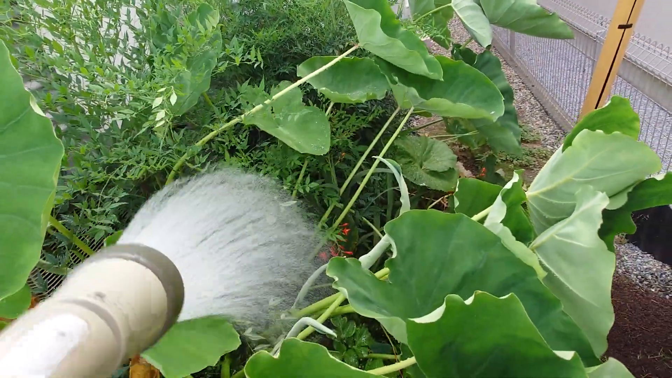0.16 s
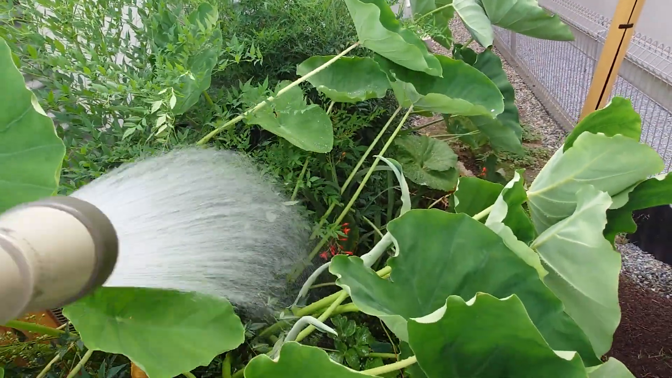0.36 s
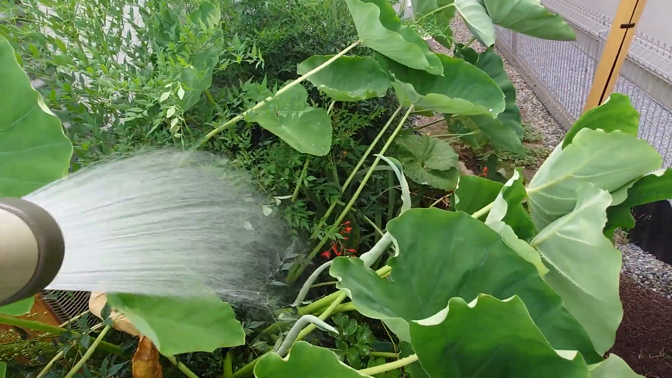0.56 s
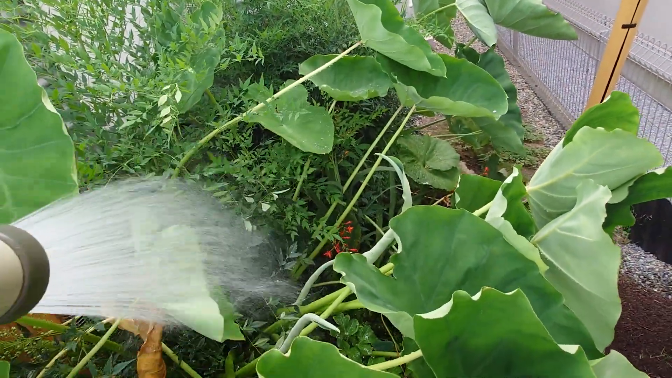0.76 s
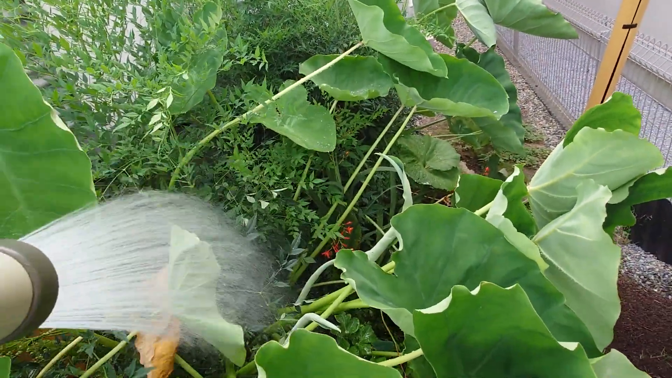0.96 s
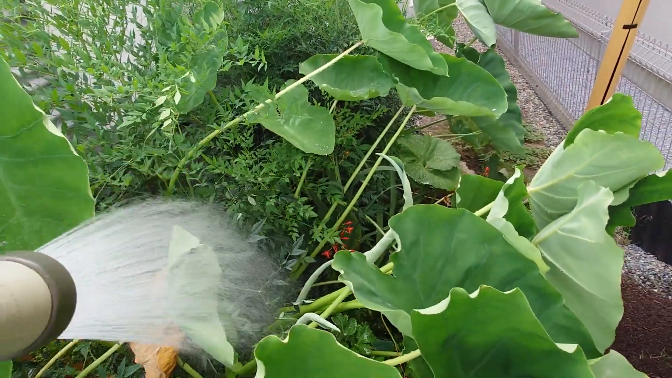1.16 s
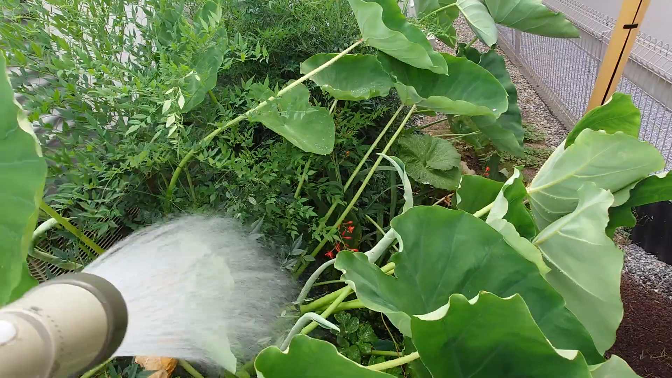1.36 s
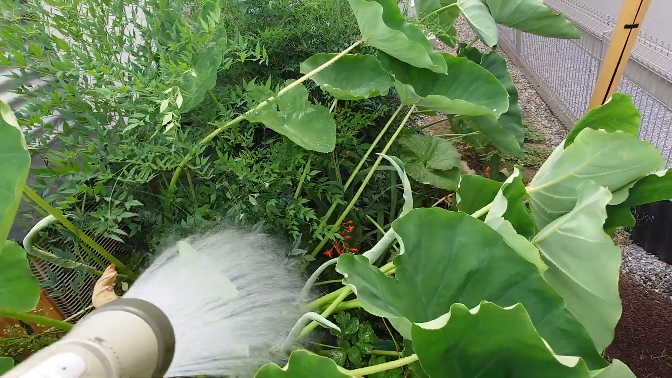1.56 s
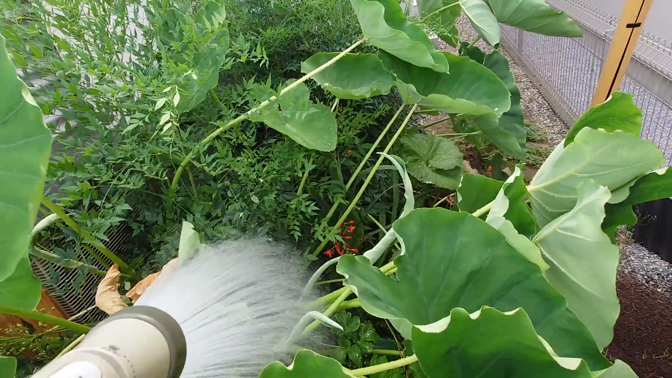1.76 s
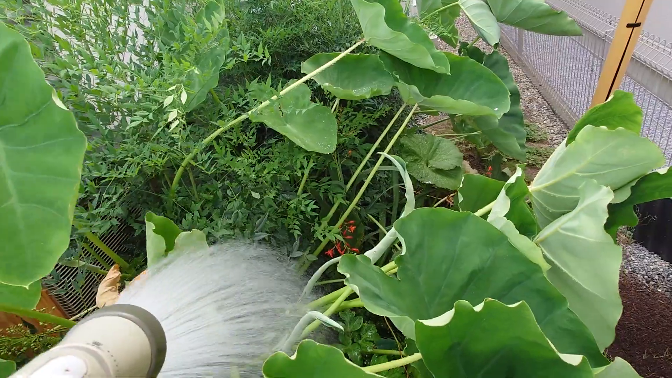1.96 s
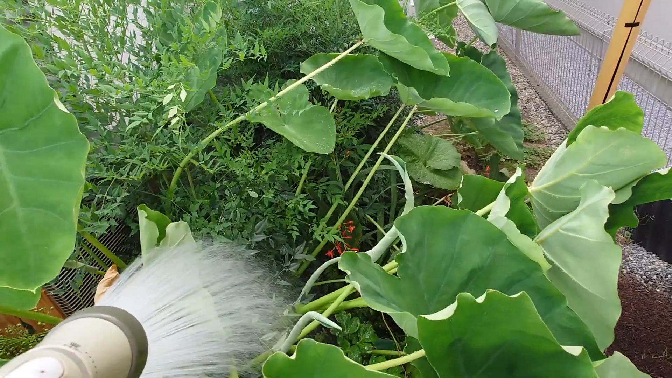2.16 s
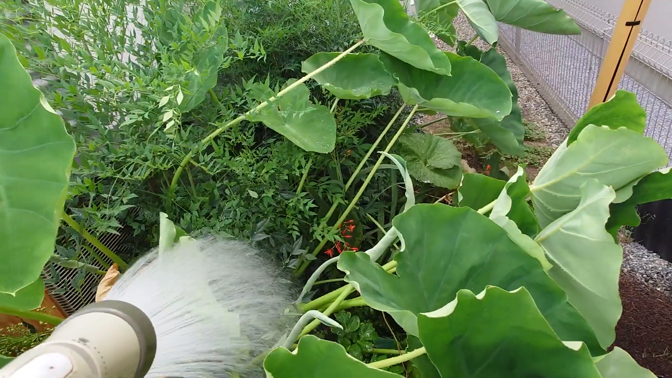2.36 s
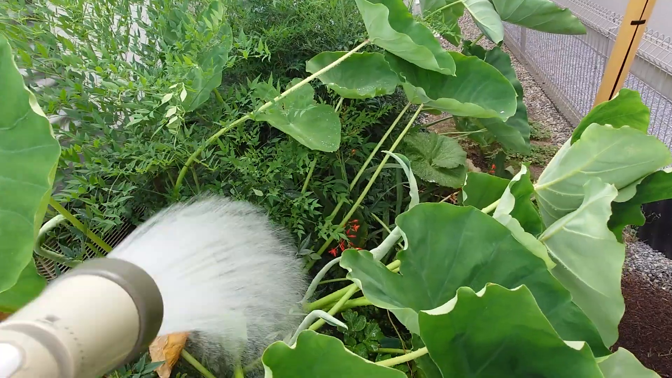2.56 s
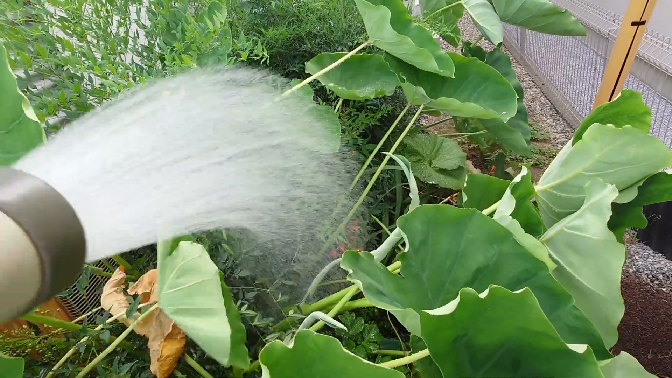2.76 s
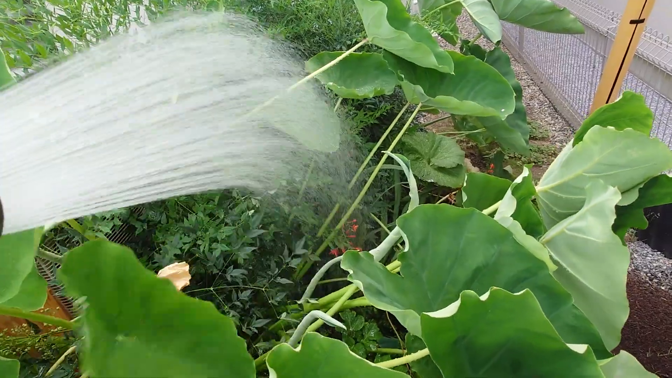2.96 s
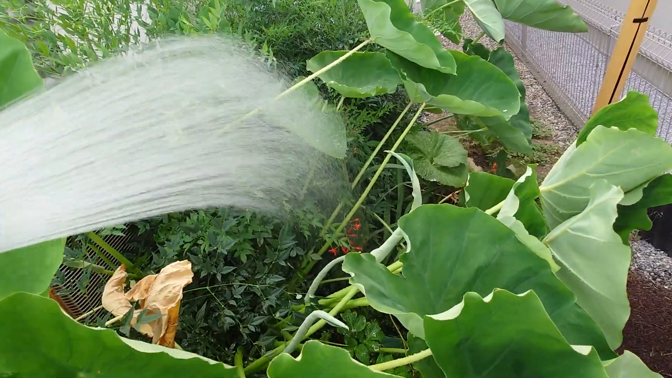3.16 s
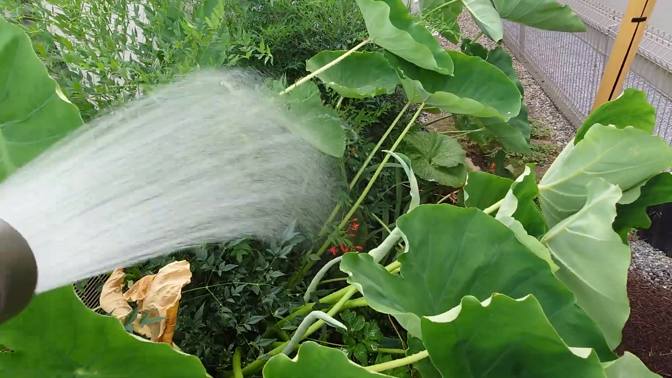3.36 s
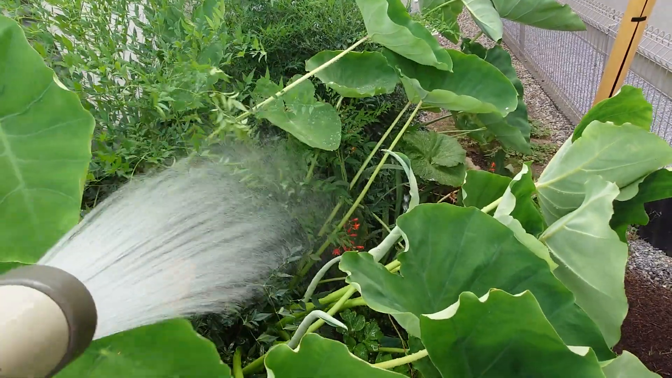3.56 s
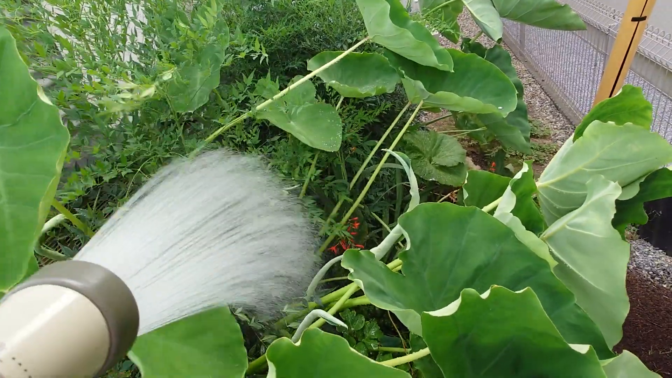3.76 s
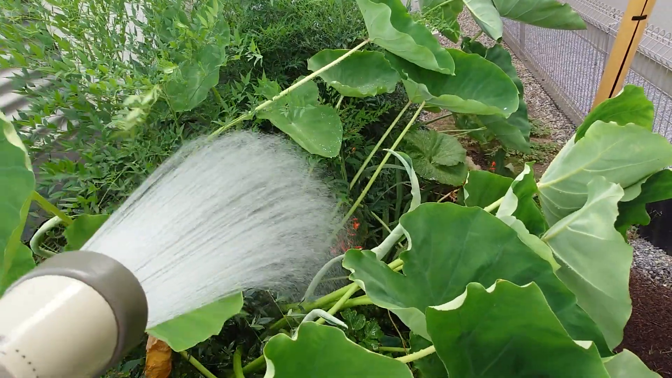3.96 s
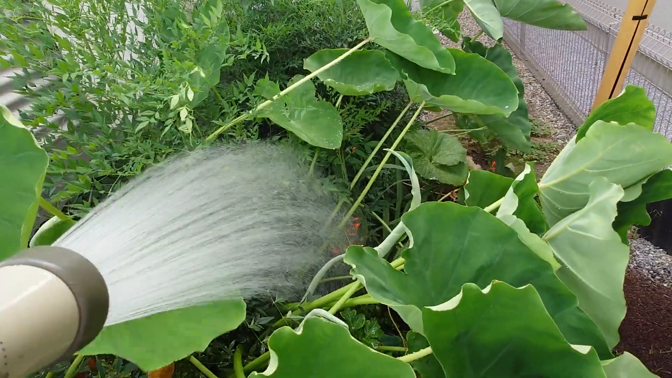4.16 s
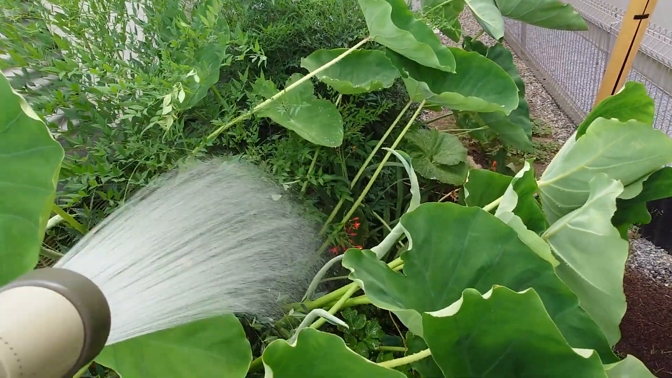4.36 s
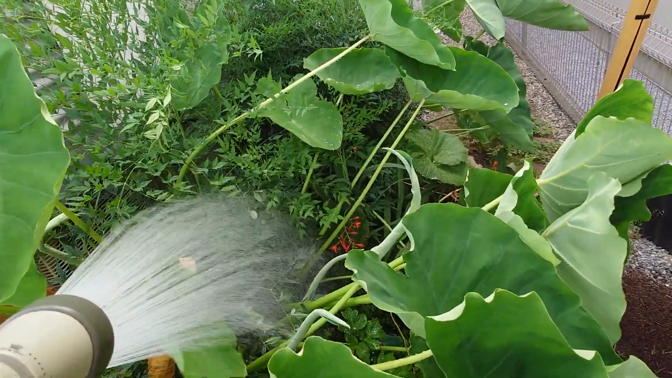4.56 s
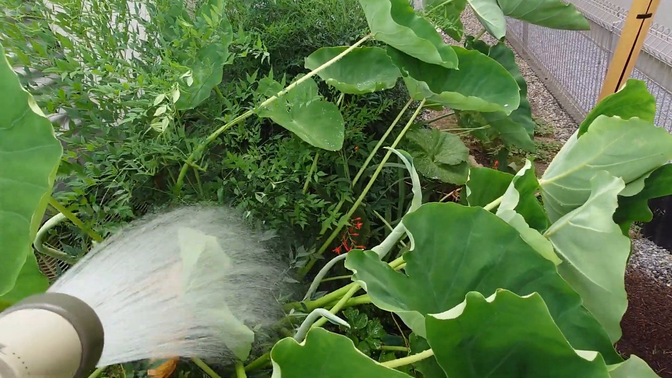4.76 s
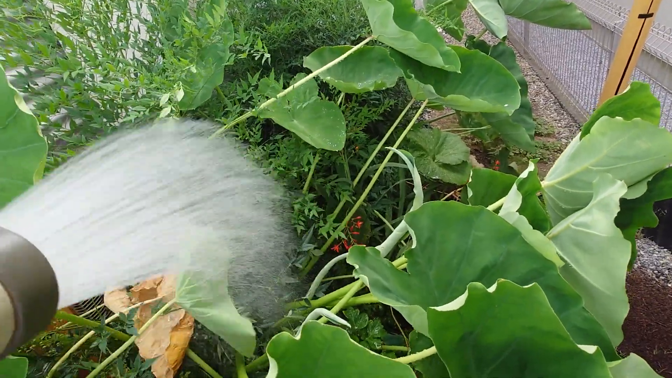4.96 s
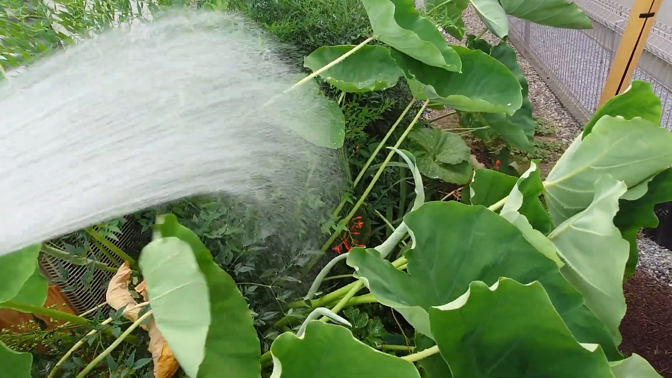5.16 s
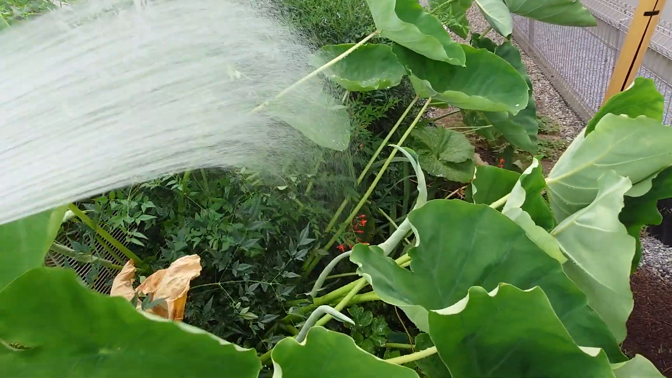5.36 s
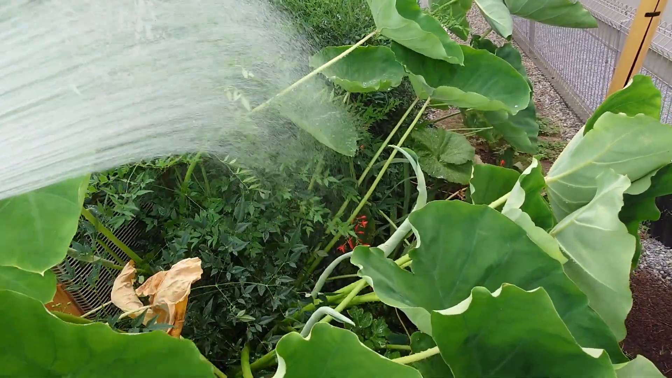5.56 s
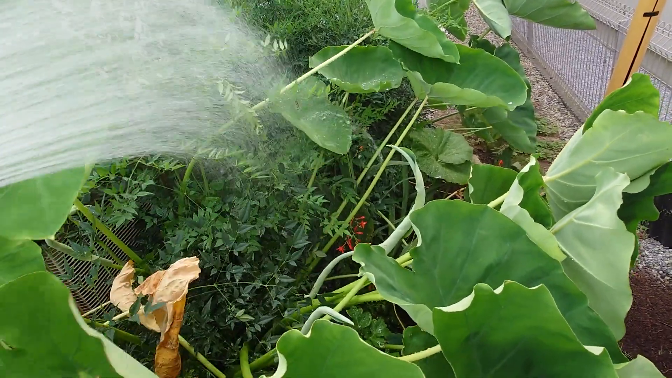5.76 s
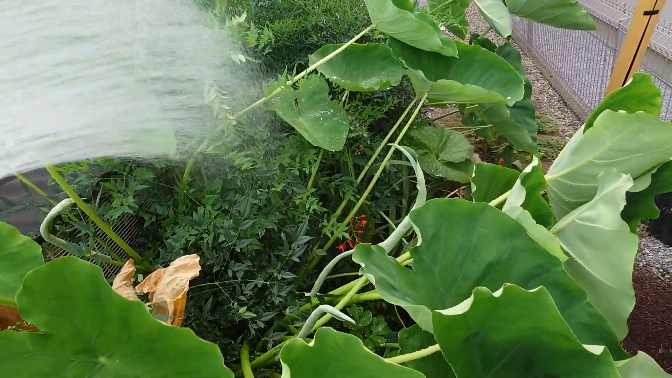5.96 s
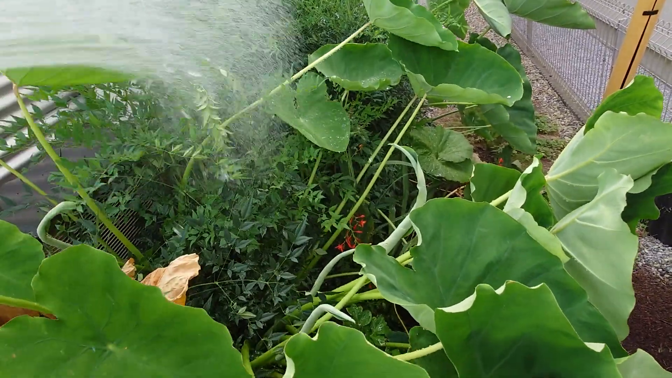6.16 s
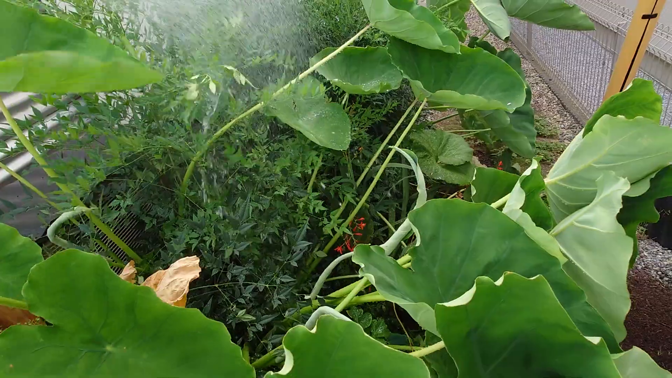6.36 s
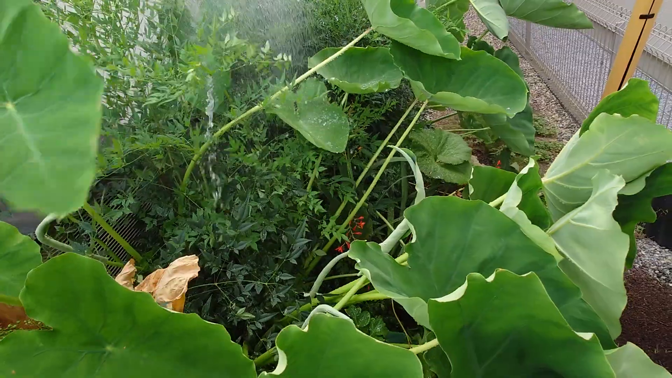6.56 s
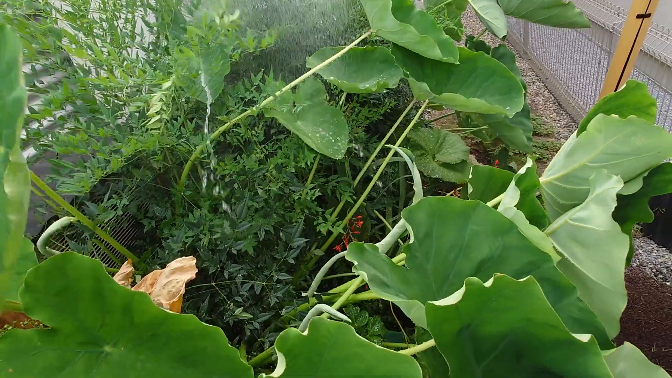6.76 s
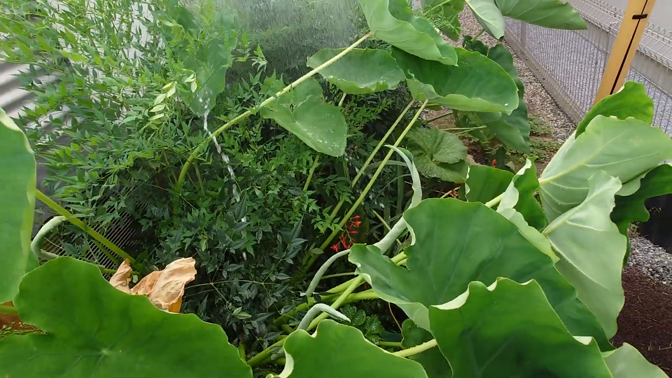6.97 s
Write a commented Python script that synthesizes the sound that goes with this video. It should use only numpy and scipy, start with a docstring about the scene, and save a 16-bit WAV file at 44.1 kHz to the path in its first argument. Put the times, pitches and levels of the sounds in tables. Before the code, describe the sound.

Outdoors in a quiet garden, a pressurised water spray hisses near a stereo microphone. Jets rattle thickly on flapping leaves with fine crisp splashing, stop and return as the spray sweeps, while softer patter rises in more distant plants. Soft wind thumps come around the middle. At the end the leaf splash drops away, leaving the hiss, patter, a few wet slaps and tiny ticking drips.

```python
"""A hand-held hose nozzle hisses close by on the left, sweeping a fan of water over a garden bed.
Noise filtered by sliding and fixed resonances makes the hiss. Random impacts make the drumming and
splashing on big leaves and the patter in foliage farther off; late on, lone drops slap and tick.
Filtered noise rumbles as air on the microphone, over a quiet garden and two faint hum tones."""
import sys
import numpy as np
from scipy import signal
from scipy.fft import rfft, irfft
from scipy.io import wavfile

SR = 44100
rng = np.random.default_rng(int(sys.argv[2]) if len(sys.argv) > 2 else 0)


def int16_out(signal):
    """Quantize to a 16-bit WAV file."""
    q = np.round(np.clip(np.atleast_2d(signal).T, -1, 1) * 32767)
    wavfile.write(sys.argv[1], SR, q.astype(np.int16))


N = 308700
TIME = np.arange(N) / SR
STEPS = TIME[::100]  # coarse time grid for level curves, seconds
HZ = np.maximum(np.arange(N // 2 + 1) * SR / N, 1)
CUTOFF_HZ = 15760

# the nozzle as the hand moves and turns it: time_s, hiss_db before the mix, resonance_hz
NOZZLE_MOVES = [(0, -44, 2320), (1.2, -38, 2350), (1.9, -42, 2360), (2.5, -38, 2355), (2.9, -39, 2269),
                (3.35, -38.4, 2310), (4.0, -40.3, 2341), (5.03, -39, 2350), (5.38, -38.8, 2266),
                (6.15, -38.5, 2305), (7, -42.5, 2246)]
# weaker resonances of the spray head: pitch_hz, width_hz at half amplitude, relative_db
HEAD_RESONANCES = [(873, 450, -12), (1175.4, 240, -4), (1856, 250, -7.5), (2028, 533, -7.5),
                   (2932, 455, -8), (3943, 1390, -16.5), (5526, 470, -11.5), (6117, 1380, -14),
                   (7140, 508, -9), (10550, 6360, -25.5), (14100, 7600, -27)]
# share of the nozzle's hiss that arrives straight: pitch_hz, share_0_to_1
DIRECT_SHARE = [(700, 0.47), (1100, 0.96), (1400, 0.76), (2250, 0.91), (3000, 0.85), (4200, 0.65),
                (6000, 0.5), (12000, 0.56)]
# colour of the two microphone ports at full depth: pitch_hz, left_minus_right_db
PORT_COLOUR = [(300, -1), (550, -4.5), (1080, 2.5), (1450, -6.5), (1900, -9.5), (2400, -9), (3500, -5.5),
               (4800, -1), (6000, 9.5), (7250, 11), (8000, -9), (9800, 1), (16000, -1)]
# share of scattered sound that both ports have in common: pitch_hz, share_0_to_1
SCATTERED_SHARE = [(350, 0.95), (700, 0.89), (1500, 0.44), (4000, 0.73), (10000, 0)]
# turning the head raises its resonance and leans it toward the right port
HEAD_PAN_DB, HEAD_PAN_DB_PER_HZ = -7.5, -0.0269

# water falling into the far foliage: time_s, level_db before trim
FOLIAGE_LEVEL = [(0, -50), (1.2, -42.5), (2.1, -49), (3.0, -52.5), (3.28, -47.5), (3.65, -60.5), (4.2, -53),
                 (5.08, -44), (5.25, -55.5), (5.82, -47), (6.04, -40), (6.17, -48.5), (6.55, -43.5),
                 (7, -50)]
# spectrum of the foliage patter: pitch_hz, relative_db per Hz
PATTER_SPECTRUM = [(120, -39), (240, -20.5), (380, -12), (520, -12.5), (750, -5.5), (950, -3.5), (1170, 2),
                   (1450, -5.5), (1850, -12.5), (2450, -2), (4300, -22.5), (6800, -20), (8600, -44),
                   (11000, -27.5)]
# spectrum of a full hit on the foliage: pitch_hz, relative_db per Hz
SMACK_SPECTRUM = [(500, -21.5), (1300, -7.5), (2000, -11), (2800, 2.5), (3600, -4), (4800, -20),
                  (7000, -15), (9000, -26)]

# the fan crosses a big leaf:
# start_s, hold_s, rise_s per 10 dB, fall_s per 10 dB, drumming_db, fine_splash_db
LEAF_CROSSINGS = [(.6, 2.12, 5, .055, -41, -46), (.86, .8, 0, 0.1144, -36.5, -40.5),
                  (1.154, 0.251, 0.287, 0.4077, -36.5, -33.5), (1.972, .75, 0.24, .055, -36.5, -58),
                  (2.35, .37, 0.29, .05, -37.5, -34.3), (3.655, .075, .045, 0.22, -42.5, -37),
                  (4.299, .81, 0.16, 0.03, -41.5, -44.5), (4.81, .24, 0.1449, 0.1, -37, -35.5),
                  (5.969, 0.095, .2, 0.1, -43.5, -48)]
# spectrum of jets drumming on a leaf: pitch_hz, relative_db per Hz
DRUM_SPECTRUM = [(150, -42), (280, -25.5), (420, -12.5), (560, -20.5), (780, -7.5), (1050, -7), (1250, -1),
                 (1490, 5.5), (1800, 4.5), (2200, -1), (2480, -2), (3500, -10), (7200, -16), (8200, -34)]
# spectrum of the fine splash: pitch_hz, relative_db per Hz
SPLASH_SPECTRUM = [(250, -31.5), (380, -21.5), (560, -24), (760, -8), (1130, -23), (1500, -1.5), (2200, -7),
                   (2600, -2), (3450, -6.5), (4350, -3.5), (5000, -7), (7200, -3), (8300, -17.5),
                   (11500, -11), (16000, -16)]
# stray jets at the edge of the fan always drum on some leaf; their splash fades as the fan lifts
STRAY_DRUM_DB, STRAY_SPLASH_DB = -51, -54.5
LIFT_S, LIFT_DB_PER_S = 6.48, 25.5

# slow gusts on the microphone: peak_s, level_db before trim
GUST_PEAKS = [(.3, -65.5), (.72, -66.5), (1.09, -65), (2.4, -57.5), (3.0, -56.5), (3.25, -56.5),
              (3.78, -55.5), (4.48, -59), (5.46, -59.5), (5.86, -56.5)]
# spectrum of the slow gusts: pitch_hz, relative_db per Hz
RUMBLE_SPECTRUM = [(10, -11), (25, 9), (45, -4.5), (70, -7.5), (200, -46.5)]
# short buffets on the microphone: peak_s, level_db before trim
BUFFET_PEAKS = [(2.58, -57), (3.33, -54.5), (3.57, -61), (3.82, -52)]
# spectrum of a buffet: pitch_hz, relative_db per Hz
BUFFET_SPECTRUM = [(25, 0.5), (55, -3.5), (100, -4), (170, -13.5), (400, -32.5), (1000, -55)]
# seconds to rise or fall 10 dB; level in between, before trim
GUST_S, CALM_SWAY_DB = 0.149, -67
BUFFET_S, CALM_BUFFET_DB = .06, -70.5
# spectrum of the quiet background: pitch_hz, relative_db per Hz
GARDEN_SPECTRUM = [(30, -13), (70, -2.5), (105, 2.5), (160, -12.5), (250, -9), (400, 1), (1000, -27.5),
                   (8000, -62)]
# far hum: pitch_hz, rms_db
HUM_TONES = [(172.3, -80), (344.5, -71)]

# single fat drops slapping a leaf: time_s, peak_db before trim and panning
LEAF_SLAPS = [(5.784, -21), (5.851, -20.5), (6.328, -28), (6.404, -28), (6.55, -23.5), (6.7, -37),
              (6.848, -26.5)]
# tiny drips ticking close by: time_s, peak_db before trim and panning
DRIP_TICKS = [(6.4424, -45.5), (6.5704, -50), (6.6288, -45), (6.7764, -45), (6.9052, -46)]
# spectrum of a slap: pitch_hz, relative_db per Hz
SLAP_SPECTRUM = [(300, -25), (1100, -8.5), (1700, -4.5), (2350, 12.5), (3200, -10.5), (7000, -23),
                 (9000, -30)]
# spectrum of a tick: pitch_hz, relative_db per Hz
TICK_SPECTRUM = [(3000, -20), (7000, -5), (12000, 0), (16000, -2)]


def from_db(db):
    """Decibels to gain."""
    return np.exp(np.asarray(db) * (np.log(10) / 20))


def rms_one(x):
    """Scale to unit rms."""
    return x / np.sqrt(np.mean(x ** 2) + 1e-20)


def in_time(rows):
    """Each column of a curve at every sample."""
    s, *columns = np.transpose(rows)
    return [np.interp(TIME, s, column) for column in columns]


def over_hz(points):
    """A table of pitch and value, read at every frequency on a log pitch scale."""
    hz, value = np.transpose(points)
    return np.interp(np.log(HZ), np.log(hz), value)


def drift(rate_hz):
    """Slow random wander with rms 1: noise that loses its treble above the rate."""
    return rms_one(irfft(rfft(rng.standard_normal(N)) / (1 + (HZ / rate_hz) ** 2), N))


def colour(x, gain):
    """Filter by a gain at every frequency; rms 1."""
    return rms_one(irfft(rfft(x) * gain, N))


def ports(depth, pan_db):
    """Left and right gain at every frequency for a source off to one side."""
    ratio = from_db(depth * over_hz(PORT_COLOUR) + pan_db)
    return np.array([ratio, np.ones_like(ratio)]) / np.sqrt(1 + ratio ** 2)


def air_noise(shared, lag_ms):
    """Stereo white noise; its shared part reaches the right port later."""
    shared = np.clip(shared, 0, 1)
    common, left, right = rfft(rng.standard_normal((3, N)))
    delay = np.exp(-2j * np.pi * HZ * lag_ms / 1000)
    together_part = np.sqrt(shared) * np.array([common, common * delay])
    separate_part = np.sqrt(1 - shared) * np.array([left, right])
    return irfft(together_part + separate_part, N)


def drops(per_s, size_db, lag_ms, scatter_ms, blur):
    """Random impacts, a few much bigger than the rest, each from its own spot, in a blur of finer mist."""
    at = np.flatnonzero(rng.random(N) < per_s / SR)
    sizes = from_db(size_db * np.minimum(rng.exponential(1, at.size), 4))
    sizes = sizes * rng.choice([-1, 1], at.size)
    # each spot has its own delay between the ports
    lags_ms = lag_ms + scatter_ms * rng.standard_normal(at.size)
    lags = np.round(lags_ms * SR / 1000).astype(int)
    left = np.bincount(at, sizes, N)
    right = np.bincount((at + lags) % N, sizes, N)
    mist = air_noise(over_hz(SCATTERED_SHARE), lag_ms)
    return rms_one(np.array([left, right])) + blur * mist


def swell(start, hold, rise, fall):
    """Rise, hold and fall in dB; rise and fall are seconds per 10 dB."""
    before = (start - STEPS) / rise  # a rise of 0 starts at once
    after = (STEPS - start - hold) / fall
    return -10 * np.maximum(np.maximum(before, after), 0)


def together(levels_db):
    """Level of unrelated sounds heard at once, at every sample: their powers add."""
    power = sum(from_db(np.maximum(db, -200)) ** 2 for db in levels_db)
    return np.interp(TIME, STEPS, 10 * np.log10(power))


def resonance(hz, width_hz):
    """Gain of a steep-sided resonance at every frequency."""
    return 1 / (1 + (2 * (HZ - hz) / width_hz) ** 2)


def nozzle(flutter_db=0.767, main_db=-0.5, others_db=-3.5, main_width_hz=230, split_hz=80):
    """Sputtering flow through the holes excites the resonances of the spray head."""
    level_db, hz = in_time(NOZZLE_MOVES)
    mean_hz = hz.mean()
    flow = air_noise(over_hz(DIRECT_SHARE), lag_ms=0.4752)
    core = air_noise(over_hz(DIRECT_SHARE), lag_ms=0.4752)

    power = sum((from_db(db) * resonance(mode_hz, width_hz)) ** 2
                for mode_hz, width_hz, db in HEAD_RESONANCES)
    others = colour(flow, np.sqrt(power) * ports(depth=1.093, pan_db=3.0))

    # the main resonance is a close pair of modes that slides about its mean pitch
    lower = resonance(mean_hz - split_hz, main_width_hz)
    upper = resonance(mean_hz + split_hz, main_width_hz)
    slide = np.exp(2j * np.pi * np.cumsum(hz - mean_hz) / SR)
    main = np.real(signal.hilbert(colour(core, np.hypot(lower, upper))) * slide)
    pan_db = HEAD_PAN_DB + HEAD_PAN_DB_PER_HZ * (hz - mean_hz)
    main = rms_one(main * from_db(np.array([pan_db, -pan_db]) / 2))

    level = from_db(level_db + flutter_db * drift(rate_hz=71))
    return level * (from_db(main_db) * main + from_db(others_db) * others)


def foliage(trim_db=-0.5, smack_db=-46, full_db=-42, steepness=1.78):
    """Spent drops patter on small leaves spread over the bed; a full hit adds a brighter smack."""
    level_db, = in_time(FOLIAGE_LEVEL)
    hits = drops(per_s=2600, size_db=3.0, lag_ms=0.12, scatter_ms=0.1553, blur=0.582)
    hard = drops(per_s=3000, size_db=2.0, lag_ms=0.138, scatter_ms=0.16, blur=0.52)
    patter = colour(hits, from_db(over_hz(PATTER_SPECTRUM)) * ports(depth=0.49, pan_db=2.5))
    smack = colour(hard, from_db(over_hz(SMACK_SPECTRUM)) * ports(depth=0.47, pan_db=1.5))
    # the smack grows faster in dB than the patter
    smack_level_db = smack_db + steepness * (level_db - full_db)
    return from_db(level_db + trim_db) * patter + from_db(smack_level_db) * smack


def leaf_levels():
    """Drumming and splash in dB: every crossing swells both, over the stray jets."""
    drum = [STRAY_DRUM_DB]
    splash = [STRAY_SPLASH_DB - LIFT_DB_PER_S * np.maximum(STEPS - LIFT_S, 0)]
    for start, hold, rise, fall, drum_db, splash_db in LEAF_CROSSINGS:
        shape_db = swell(start, hold, rise, fall)
        drum.append(drum_db + shape_db)
        splash.append(splash_db + shape_db)
    return together(drum), together(splash)


def big_leaves(flap_db=0.4671):
    """The jets drum on a flapping leaf and burst into fine, bright droplets."""
    drum_db, splash_db = leaf_levels()
    flap = flap_db * drift(rate_hz=10.1)
    hits = drops(per_s=5000, size_db=1.5, lag_ms=0.1583, scatter_ms=0.066, blur=0.728)
    spray = drops(per_s=9000, size_db=1.5, lag_ms=.26, scatter_ms=0.038, blur=0.65)
    drum = colour(hits, from_db(over_hz(DRUM_SPECTRUM)) * ports(depth=0.994, pan_db=0.0))
    splash = colour(spray, from_db(over_hz(SPLASH_SPECTRUM)) * ports(depth=1.0, pan_db=2.0))
    return from_db(drum_db + flap) * drum + from_db(splash_db + flap) * splash


def puffs(rows, edge_s, calm_db):
    """Level in dB of moving air: like-shaped puffs over a calm."""
    return together([calm_db] + [db + swell(s, 0, edge_s, edge_s) for s, db in rows])


def wind(sway_trim_db=3.5, buffet_trim_db=1.0):
    """Lumpy air on the ports: slow low gusts, and short buffets that reach higher in pitch."""
    sway_db = puffs(GUST_PEAKS, GUST_S, CALM_SWAY_DB) + sway_trim_db
    buffet_db = puffs(BUFFET_PEAKS, BUFFET_S, CALM_BUFFET_DB) + buffet_trim_db
    sway = colour(air_noise(shared=0.527, lag_ms=0), from_db(over_hz(RUMBLE_SPECTRUM)))
    buffet_gain = from_db(over_hz(BUFFET_SPECTRUM)) * ports(depth=0, pan_db=-1.0)
    buffet = colour(air_noise(shared=0.895, lag_ms=0), buffet_gain)
    return from_db(sway_db) * sway + from_db(buffet_db) * buffet


def garden(level_db=-69):
    """The quiet background: steady low noise, the same at both ports."""
    return from_db(level_db) * colour(air_noise(shared=1.0, lag_ms=0), from_db(over_hz(GARDEN_SPECTRUM)))


def hum(wander_rad=0.986):
    """Faint steady tones whose phase wanders, so their pitch wavers."""
    total = np.zeros(N)
    for hz, db in HUM_TONES:
        phase = 2 * np.pi * hz * TIME + wander_rad * drift(rate_hz=6.2)
        total += from_db(db) * rms_one(np.sin(phase))
    return total


def single_drops(rows, spectrum, trim_db):
    """Each lone drop is one short impact with the colour of what it hits."""
    s, peak_db = np.transpose(rows)
    clicks = np.bincount(np.round(s * SR).astype(int), from_db(peak_db + trim_db), N)
    gain = from_db(over_hz(spectrum))
    impacts = irfft(rfft(clicks) * gain * ports(depth=.6, pan_db=3), N)
    return impacts / irfft(gain, N).max()  # peak 1 for a unit click before panning


def scene():
    """Nozzle, water on the plants, the open air and lone drops."""
    slaps = single_drops(LEAF_SLAPS, SLAP_SPECTRUM, trim_db=2.0)
    ticks = single_drops(DRIP_TICKS, TICK_SPECTRUM, trim_db=1.0)
    return nozzle() + foliage() + big_leaves() + wind() + garden() + hum() + slaps + ticks


def record(dry):
    """The top is cut steeply."""
    steep_lowpass = signal.ellip(12, .1, 80, CUTOFF_HZ, fs=SR, output="sos")
    return signal.sosfilt(steep_lowpass, dry)


dry = scene()
out = record(dry)
int16_out(out)
```